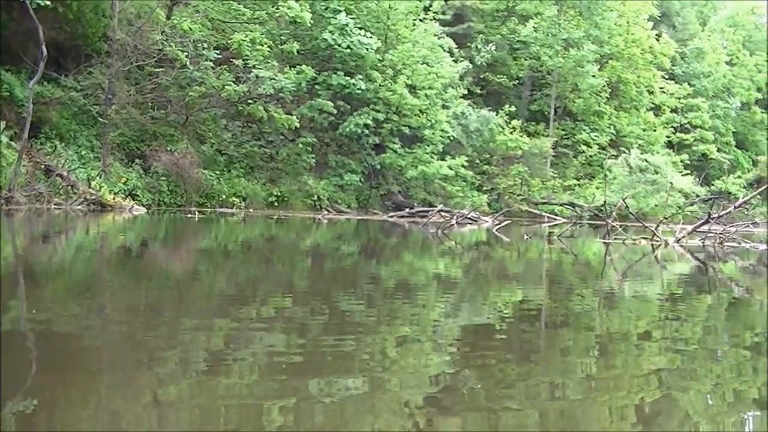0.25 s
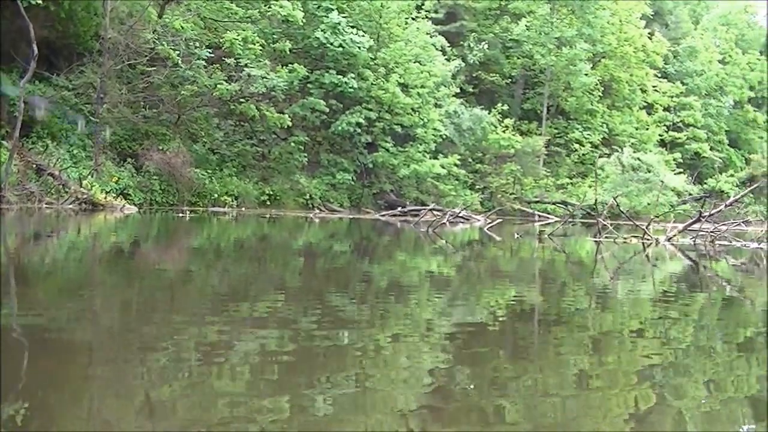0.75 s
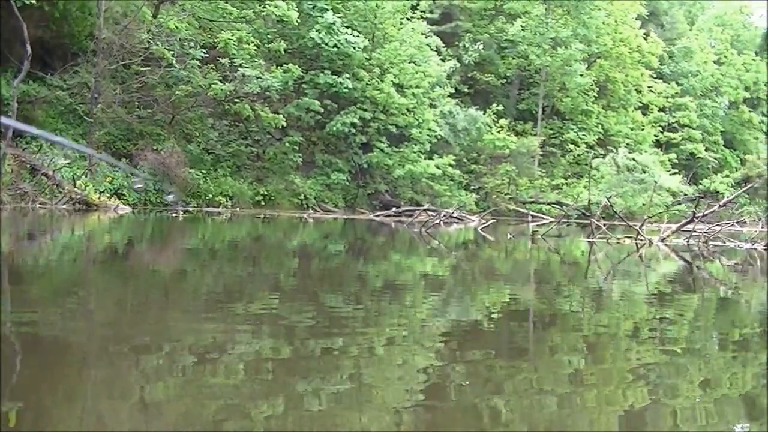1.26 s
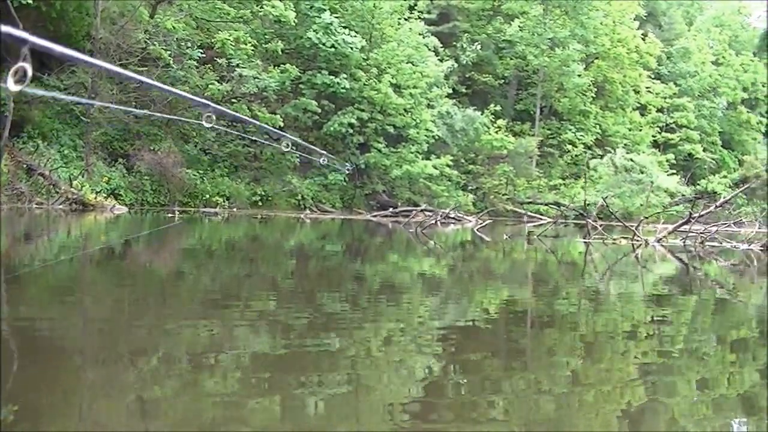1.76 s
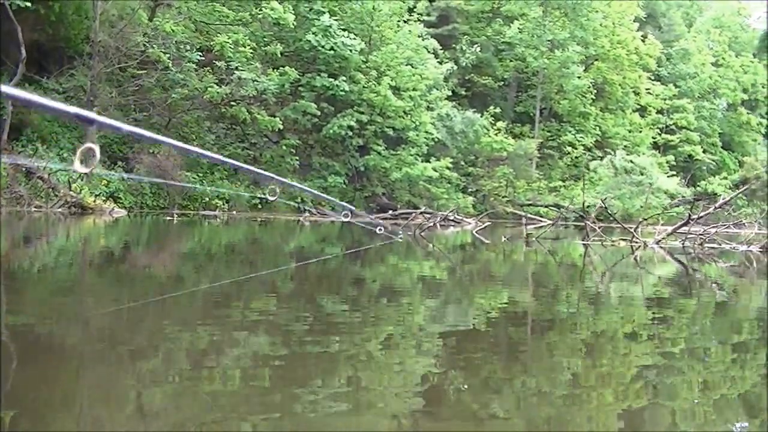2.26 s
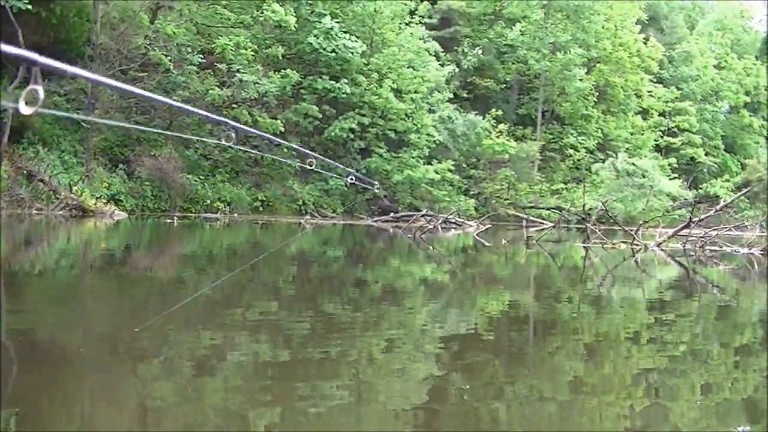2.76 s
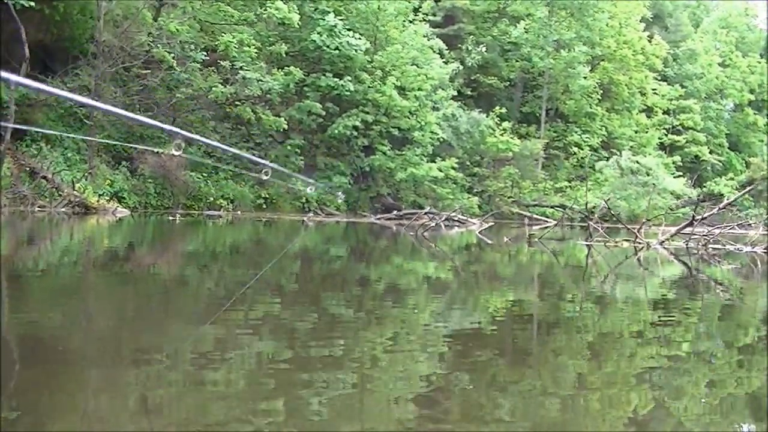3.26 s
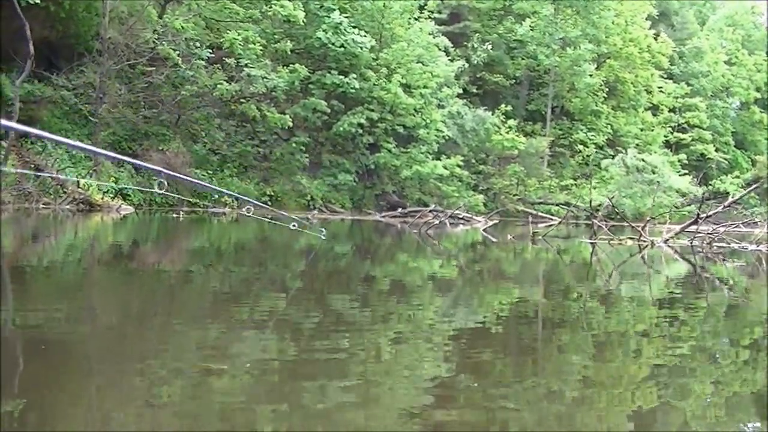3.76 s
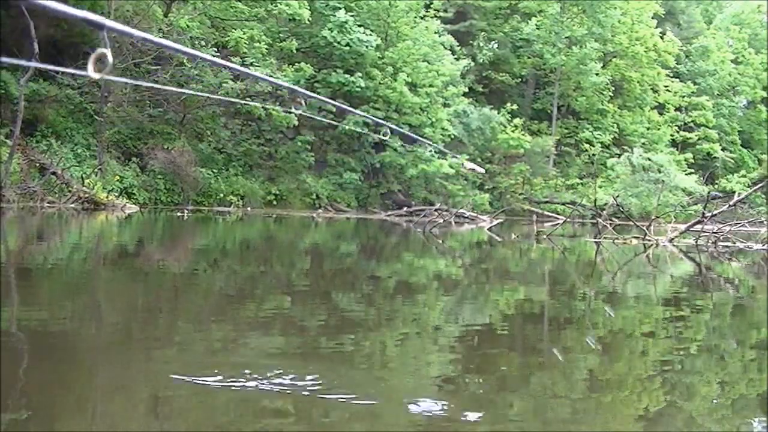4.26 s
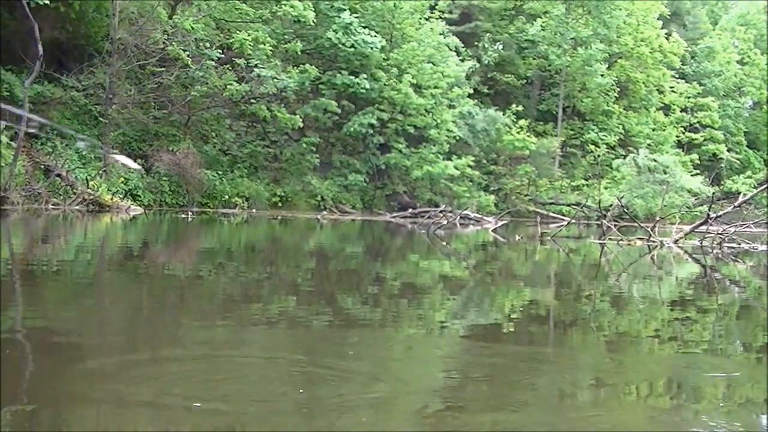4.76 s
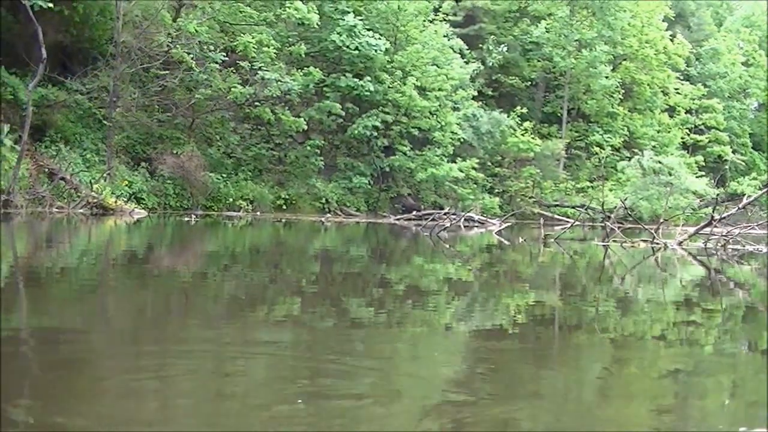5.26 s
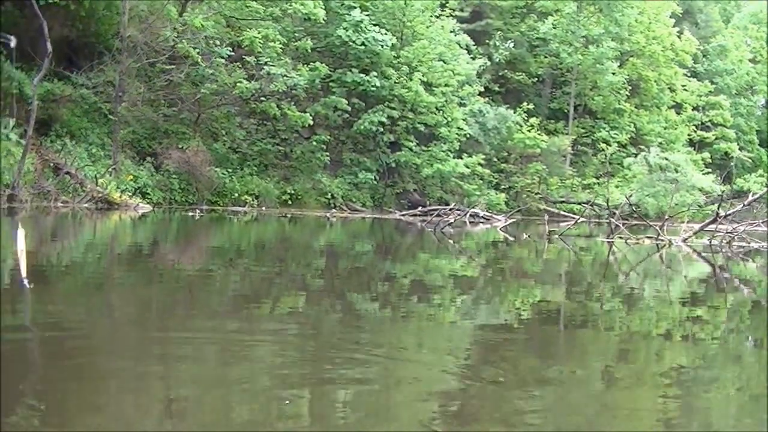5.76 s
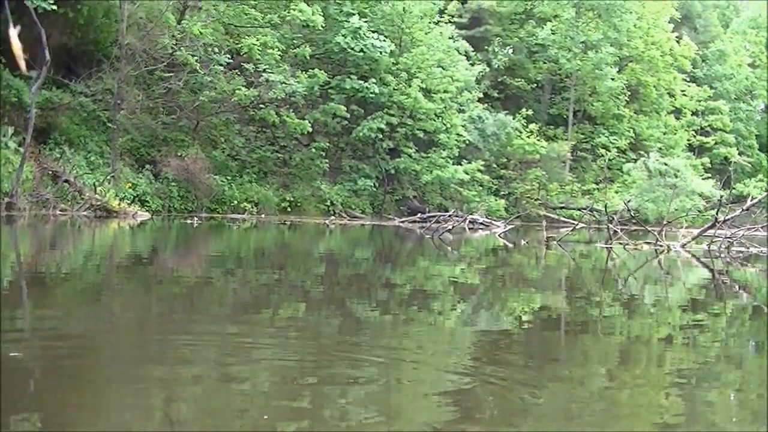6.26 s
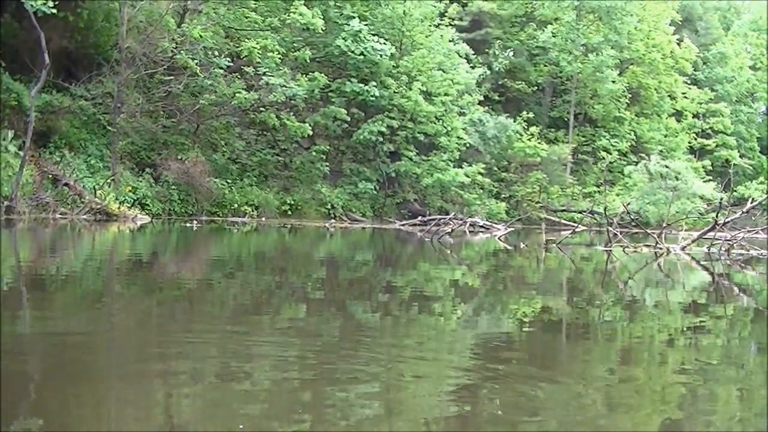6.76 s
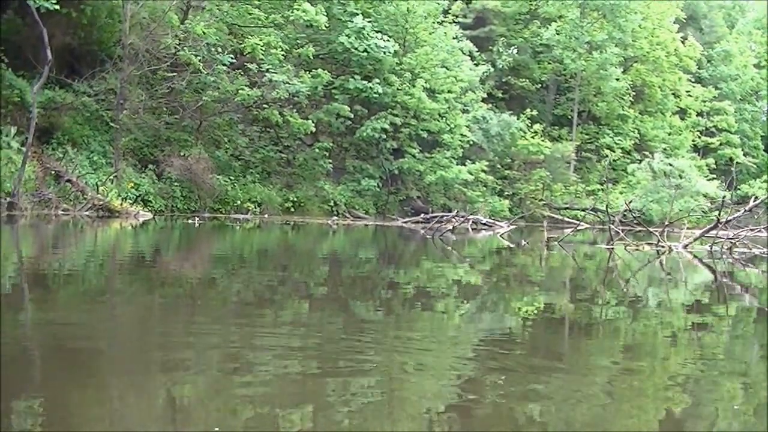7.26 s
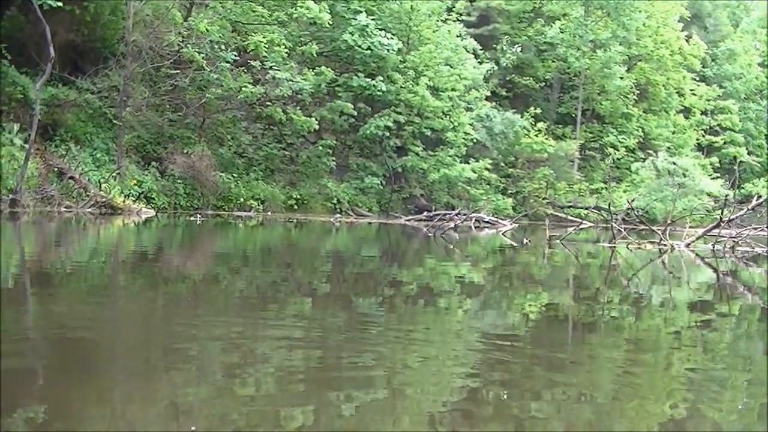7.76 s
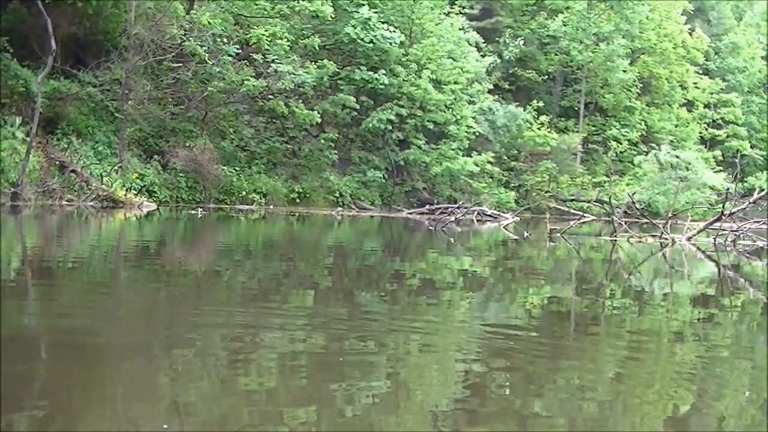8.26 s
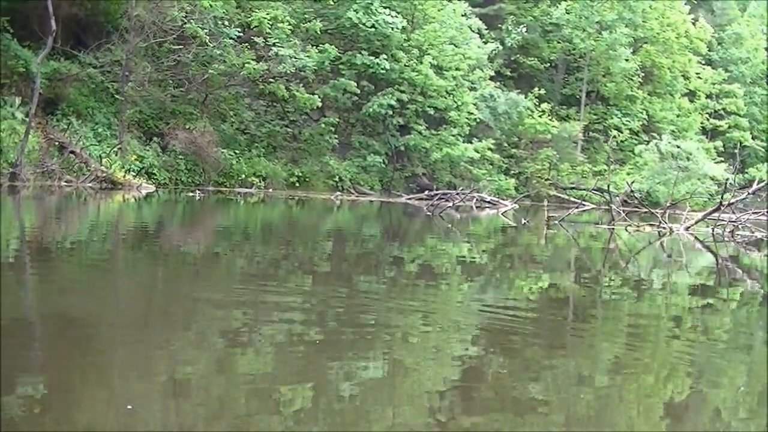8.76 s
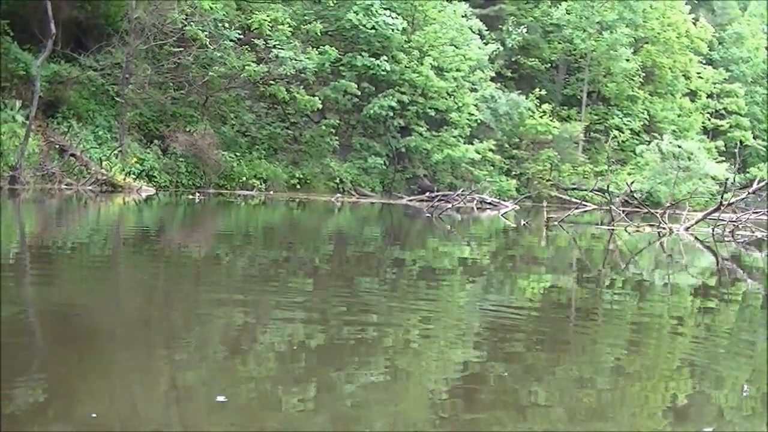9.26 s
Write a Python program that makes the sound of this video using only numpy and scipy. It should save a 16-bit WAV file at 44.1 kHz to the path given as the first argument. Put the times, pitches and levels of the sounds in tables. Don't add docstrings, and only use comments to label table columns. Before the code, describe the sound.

Soft reel winding among frogs, birds and water pops, then a hard lure rattle, ratcheting drag, a metal snap and a whooshing cast with hissing line.

```python
import sys
import numpy as np
from scipy import signal
from scipy.fft import rfft, irfft
from scipy.io import wavfile

SR = 44100
rng = np.random.default_rng(int(sys.argv[2]) if len(sys.argv) > 2 else 0)


def voltage_ratio(decibels):
    exponent = np.asarray(decibels, float) / 20
    return 10 ** exponent


def pcm_store(signal):
    levels = np.round(np.clip(np.atleast_2d(signal), -1, 1) * 32767)
    wavfile.write(sys.argv[1], SR, levels.astype(np.int16).T)


N = 419832


def unit(x):
    return x / np.sqrt(np.mean(x ** 2) + 1e-20)


def noise():
    return rng.standard_normal(N)


def drift(rate):
    knots = rng.standard_normal(400)
    return np.interp(np.arange(N) / SR * rate, np.arange(400), knots)


def in_time(rows):
    s, *columns = np.transpose(rows)
    t = np.arange(N) / SR
    starts_open = s[0] < .01
    gate = np.clip(np.minimum(t - s[0], s[-1] - t) / .02 + starts_open, 0, 1)
    return [gate * (t <= s[-1])] + [np.interp(t, s, c) for c in columns]


def band(x, lo_hz, hi_hz):
    return signal.sosfilt(signal.butter(2, [lo_hz, min(hi_hz, .45 * SR)], "band", fs=SR, output="sos"), x)


def ring(x, hz, t60):
    r, w = voltage_ratio(-60 / (t60 * SR)), 2 * np.pi * hz / SR
    return signal.lfilter([0, np.sin(w)], [1, -2 * r * np.cos(w), r * r], x + 1e-18)


def add(out, s, sound, peak_db):
    i = round(s * SR)
    out[i:i + len(sound)] += (voltage_ratio(peak_db) * sound / np.abs(sound).max())[:N - i]


def puff(rise_s, t60):
    t = np.arange(2600) / SR
    return rng.standard_normal(len(t)) * (1 - np.exp(-t / rise_s)) * voltage_ratio(-60 * t / t60)


def chirp(length_s, hz_points, second_db=-40, rough=0.):
    u = np.linspace(0, 1, max(round(length_s * SR), 8))
    flutter = np.interp(u * length_s * 350, np.arange(60), rng.standard_normal((60, 2)) @ [1, 1j])
    hz = np.interp(u, np.linspace(0, 1, len(hz_points)), hz_points)
    hz = hz * (1 + 0.056 * rough * flutter.real)
    phase = 2 * np.pi * np.cumsum(hz) / SR
    shape = np.sin(np.pi * u) ** .5 * voltage_ratio(6 * rough * flutter.imag)
    return shape * (np.sin(phase) + voltage_ratio(second_db) * np.sin(2 * phase + 1))


def whistle(hz, width_hz, count=N):
    low_pass = signal.butter(2, width_hz / 2, fs=SR, output="sos")
    slow = signal.sosfilt(low_pass, rng.standard_normal((2, count)))
    phase = 2 * np.pi * np.cumsum(hz) / SR
    return np.pad(unit(slow[0] * np.sin(phase) + slow[1] * np.cos(phase)), (0, N - count))


def woods(x, t60, gap_s):
    t = np.arange(SR) / SR
    tail = rng.standard_normal(SR) * voltage_ratio(-60 * t / t60) * (1 - np.exp(-t / gap_s))
    return signal.fftconvolve(x, tail / np.sqrt(np.sum(tail ** 2)))[:N]


def winding():
    # (time [s], level [dB])
    whirr = [(0.0, -63.5), (2.1, -67.5), (2.41, -64), (3.08, -65), (4.1, -71)]
    # (pitch [Hz], width [Hz], level [dB])
    gears = [(2404, 610, 7), (3600, 21, -2), (3810, 22, 2), (4400, 120, 9), (4820, 66, -7),
             (6040, 290, -5.5), (6500, 48, -1), (7000, 190, 2.5), (8600, 140, -13), (9400, 130, -14),
             (11300, 160, -14)]
    # (start [s], end [s], pitch [Hz], level over the whirr [dB])
    meshes = [(0, .5, 11200, -9), (0.05, .85, 9300, -12), (2.2, 3.9, 11250, -11), (2.52, 2.72, 9400, -6),
              (2.95, 3.15, 9400, -7), (3.4, 3.62, 6500, -4), (3.5, 4.0, 9350, -13), (2.3, 3.4, 8600, -13)]
    # (time [s], peak level [dB])
    insect_pulses = [(1.052, -71), (1.1308, -69), (1.4416, -67), (1.513, -68), (1.5978, -66), (1.6894, -69),
                     (1.8352, -66), (1.9126, -64), (2.0233, -67), (2.0981, -66), (2.1829, -65), (2.2638, -64),
                     (2.3426, -63), (2.5057, -64), (2.585, -67), (2.7297, -65), (2.9118, -66), (2.9871, -68),
                     (3.3528, -68), (3.4291, -66)]
    gate, level_db = in_time(whirr)
    stop = round(whirr[-1][0] * SR)
    out = .5 * unit(band(noise(), 900, 13000))
    for hz, width_hz, db in gears:
        wander_hz = hz * (1 + .008 * drift(2.5))
        patch_db = 3.5 * drift(4.) + 3 * drift(25.)
        rub = whistle(wander_hz[:stop], max(2.5 * width_hz, 250), stop)
        out += 0.33 * voltage_ratio(db / 2 + patch_db) * rub
    out = out / np.std(out[:stop]) * 1.04
    t = np.arange(N) / SR
    for start, end, hz, db in meshes:
        spell = np.clip(np.minimum(t - start, end - t) / .07, 0, 1)
        wander_hz = hz * (1 + .006 * drift(3.))
        out += spell * voltage_ratio(db - 3.5 + 3. * drift(12.)) * whistle(wander_hz[:stop], 420, stop)
    out *= gate * voltage_ratio(level_db)
    for s, db in insect_pulses:
        add(out, s - .005, chirp(.04, [12150, 12150], rough=.17), db - 6.5)
    return out


def knocks():
    # (time [s], peak level [dB], bright part [dB], pitch of the struck spot [Hz])
    hits = [(4.1004, -15.5, -13, 3750), (4.1055, -19.5, -15, 3000), (4.112, -31, -15, 2700),
            (4.118, -36, -12, 3740), (4.129, -46, -1, 3000), (4.1355, -45, 0, 2390), (4.168, -50, -4, 3500),
            (4.1767, -42, -6, 2790), (4.184, -46, -6, 3500), (4.1904, -36, -6, 2310),
            (4.195, -19.5, -14, 2250), (4.199, -24, -12, 2400), (4.2115, -44, -2, 2390),
            (4.216, -44, -2, 3500), (4.221, -44, -3, 4400), (4.2248, -34, -8, 5700),
            (4.2362, -29, -9, 3700), (4.2405, -37, -4, 3700), (4.251, -45, -4, 5500),
            (4.2574, -40, -6, 4370), (4.274, -50, -2, 2730), (4.29, -47, 2, 4800), (4.2948, -41, -3, 5700),
            (4.311, -46, -2, 4390), (4.3245, -39, -3, 4760), (4.3816, -44, -8, 4420),
            (4.388, -50, -6, 3500), (4.3999, -37, -9, 2340), (4.408, -48, -6, 3500),
            (4.4418, -49, -4, 3290), (4.448, -49, -14, 4300), (4.4544, -44, -11, 4360),
            (4.4595, -48, -14, 5000), (4.465, -40, -11, 4480), (4.472, -48, -16, 4000),
            (4.479, -47, -14, 4400), (4.486, -47, -16, 4400), (4.4927, -41, -9, 4510),
            (4.501, -46, -14, 4200), (4.5094, -46, -16, 3810), (4.519, -47, -18, 4200),
            (4.531, -49, -18, 4000), (4.5465, -48, -14, 2600), (4.6907, -47, -8, 5800),
            (4.7194, -48, -16, 5000), (4.745, -50, -8, 5800)]
    # (pitch [Hz], level [dB])
    lure = [(1700, -38), (2350, -5.5), (2700, -1.5), (3240, -9), (3750, 1), (4450, 3), (5800, -8)]
    lure_t60_s, thud_db = .011, -14
    out = np.zeros(N)
    for s, db, bright_db, spot_hz in hits:
        contact_s = .0047 + .00005 * (db + 20)
        touch = puff(contact_s / 4, 5 * contact_s)
        body = np.zeros(len(touch))
        for hz, mode_db in lure:
            nearness_db = -8 * abs(np.log2(hz / spot_hz))
            mode_hz = hz * (1 + 0.07 * rng.standard_normal())
            body += voltage_ratio(mode_db + nearness_db) * ring(touch, mode_hz, lure_t60_s)
        body = unit(body) + .9 * unit(band(touch, 2200, 8500))
        add(out, s - .0007, band(body, .42 * spot_hz, 16000), db)
        add(out, s - .0007, band(touch, 6000, 13500), db + bright_db)
        add(out, s - .0007, band(touch, 420, 800), db + thud_db - 12 * np.log2(spot_hz / 2350))
    return out


def drag():
    # (time [s], peak level [dB])
    pawl = [(5.0828, -46), (5.1083, -39), (5.1277, -37), (5.1442, -35), (5.1587, -36), (5.1726, -37),
            (5.1861, -36), (5.1981, -35), (5.2096, -34), (5.2204, -34), (5.23, -36), (5.24, -36),
            (5.2464, -38), (5.25, -34), (5.2609, -34), (5.2699, -33), (5.2784, -33), (5.2874, -35),
            (5.2979, -35), (5.3068, -33), (5.3168, -34), (5.3258, -33), (5.3348, -31), (5.3443, -32),
            (5.3524, -32), (5.3614, -34), (5.3684, -38), (5.3764, -36), (5.3862, -35), (5.3956, -33),
            (5.4036, -33), (5.4104, -32), (5.4184, -34), (5.439, -31), (5.458, -30), (5.468, -30),
            (5.4784, -32), (5.4909, -34), (5.5044, -37), (5.5194, -37)]
    # (time [s], peak level [dB])
    further_teeth = [(5.4295, -34), (5.4492, -31)]
    # (pitch [Hz], level [dB], time to die by 60 dB [s])
    spool = [(1410, -19, 0.058), (3020, -19, 0.019), (4820, -12.5, 0.11), (5780, 0, 0.005),
             (6640, 3.5, 0.005), (7460, -21.5, 0.2), (9430, -11, .006), (12600, -23, 0.025)]
    touch = np.zeros(N)
    for s, peak_db in pawl + further_teeth:
        add(touch, s - .0004, puff(.0006, .012), peak_db + 3.)
    body = sum(voltage_ratio(db - 18.5) * ring(touch, hz, t60) for hz, db, t60 in spool)
    return body + .95 * band(touch, 8300, 16000) + 0.8 * band(touch, 2200, 3900)


def bail():
    # (time [s], peak level [dB], ringing pitch [Hz])
    bail_snaps = [
        (7.4897, -12.5, 7000),
        (7.5063, -27, 6110),
        (8.2327, -15.5, 6600),
        (8.246, -25, 6040),
        (8.2504, -24, 6000),
        (8.2549, -18, 6160),
        (8.2593, -17.5, 6020),
        (8.2642, -17.5, 5900),
        (8.2784, -27, 6950),
    ]
    out = np.zeros(N)
    for s, db, hz in bail_snaps:
        touch = puff(.0001, .005)
        wire = unit(ring(touch, hz, 0.0077))
        spring = .15 * unit(ring(touch, 4400, 0.006))
        crack = 1.3 * unit(band(touch, 2500, 11000))
        add(out, s, wire + spring + crack, db)
    return out


def snaps():
    # (time [s], bright part [dB], dull part [dB])
    cracks = [(.616, -51, -43), (.7978, -46, -63), (2.167, -48, -58), (2.324, -49, -57), (3.3774, -51, -58),
              (3.938, -53, -45), (6.042, -55, -46), (6.2073, -52, -62), (6.4477, -59, -48),
              (6.8528, -52, -62), (6.904, -53, -58), (7.1132, -51, -59), (7.2, -52, -53),
              (7.5592, -51, -60), (7.5887, -50, -48), (7.6251, -47, -35.5), (7.646, -45, -55),
              (7.669, -51, -62), (7.7333, -50, -52), (7.8066, -56, -46), (7.857, -52, -43.5),
              (7.9054, -54, -44), (7.9588, -50, -43), (8.629, -53, -42), (8.7367, -48, -41),
              (8.7644, -58, -40), (8.8172, -46, -57), (8.89, -52, -46), (9.348, -58, -46.5),
              (8.146, -48, -43)]
    # (time [s], peak level [dB])
    grit = [(0.0862, -53), (0.1276, -58), (0.3504, -55), (0.3954, -55), (0.4824, -56), (0.7552, -57),
            (1.1189, -58), (1.1824, -59), (1.274, -53), (1.3309, -56), (1.503, -58), (1.717, -57),
            (1.7514, -58), (1.9126, -58), (1.9799, -60), (2.0228, -59), (2.0722, -53), (3.3533, -56),
            (3.4924, -61), (3.7464, -59), (3.8681, -57), (3.9564, -57)]
    # (time [s], peak level [dB])
    coil_slaps = [(8.3135, -43), (8.4254, -39), (8.4524, -40), (8.4774, -43), (8.5094, -48), (8.5384, -47),
                  (8.5574, -52), (8.6354, -53), (8.8024, -53)]
    out = np.zeros(N)
    for s, bright_db, dull_db in cracks:
        touch = puff(0.00084, .012)
        add(out, s - .0003, band(touch, 4700, 12400), bright_db)
        add(out, s - .0003, band(touch, 3000, 6400), dull_db)
    for s, db in grit + coil_slaps:
        add(out, s - .0003, band(puff(.0002, .006), 8000, 15500), db - 1.5)
    return out


def rod_whip():
    # (time [s], tip speed as whistle pitch [Hz], effort as rush of air [dB])
    rod_swing = [
        (8.15, 1300, -54),
        (8.175, 1650, -44),
        (8.19, 2300, -35),
        (8.202, 2822, -31),
        (8.217, 3050, -29.5),
        (8.224, 2800, -30),
        (8.232, 1700, -31.5),
        (8.26, 1200, -42),
        (8.3, 900, -58),
    ]
    # (taut at [s], pitch then [Hz], glide [Hz/s], level [dB], slack at [s])
    line_whip = [
        (8.174, 3000, 30000, -37, 8.192),
        (8.199, 5600, -20000, -31.5, 8.212),
        (8.218, 4600, -30000, -30.5, 8.227),
    ]
    gate, tip_hz, rush_db = in_time(rod_swing)
    t = np.arange(N) / SR
    tip_db = -25 + 27 * np.log2(tip_hz / 3000)
    swing = voltage_ratio(tip_db) * whistle(tip_hz, 600)
    for taut, taut_hz, glide, whip_db, slack in line_whip:
        outside_s = np.maximum(np.maximum(taut - t, t - slack), 0)
        line_hz = taut_hz + glide * np.clip(t - taut, 0, slack - taut)
        swing += voltage_ratio(whip_db - 2500 * outside_s) * whistle(line_hz, 450)
    swing += voltage_ratio(rush_db - 3.2 + 3. * drift(150.)) * unit(band(noise(), 650, 6800))
    return gate * swing


def payout():
    # (time [s], hiss level [dB], hiss centre [Hz])
    hiss_course = [
        (8.19, -51, 7000),
        (8.26, -47, 6970),
        (8.3, -44.5, 8900),
        (8.38, -45, 9700),
        (8.5, -47.5, 8300),
        (8.63, -54.5, 6900),
        (8.75, -63, 6380),
        (8.95, -70, 5470),
    ]
    dry_s = 8.27
    coils_per_s, slowing_per_s2, flutter_db, sway = 85, 70, 2.0, .08
    open_spool, hiss_db, hiss_hz = in_time(hiss_course)
    after_s = np.arange(N) / SR - dry_s

    slaps = (rng.random(N) < 160 / SR) * rng.exponential(1, N)
    slaps = signal.lfilter([1], [1, -voltage_ratio(-60 / (0.0099 * SR))], slaps) * noise()

    coil_rate = (coils_per_s - slowing_per_s2 * after_s) * voltage_ratio(2 * drift(25.))
    coils = np.cumsum(coil_rate) / SR
    sway_hz = hiss_hz * (1 + sway * np.sin(2 * np.pi * coils) + .06 * drift(30.))
    core = unit(whistle(sway_hz, 1800) + .9 * whistle(1.04 * hiss_hz, 4500))
    depth_db = flutter_db * np.clip(5 * after_s, 0, 1.5)
    flutter = voltage_ratio(depth_db * (1 - 2 * (coils % 1)) + 2.2 * drift(60.))
    hiss = flutter * core + .07 * unit(band(slaps, 3000, 15000))

    spray_db = -40.5 - 130 * np.maximum(after_s, 0)
    spray = voltage_ratio(spray_db + 4.9 * drift(120.)) * unit(band(noise(), 9600, 16000))
    return open_spool * (voltage_ratio(hiss_db) * hiss + spray)


def cast():
    out = band(rod_whip() + payout(), 320, 19000)
    return out + voltage_ratio(-18.5) * woods(out, 1.0, 0.014)


def drips():
    # (time [s], peak level [dB], pitch [Hz])
    pops = [(0.2776, -43.5, 2830), (0.4335, -42.5, 2250), (0.608, -45, 1730), (0.6258, -50, 1320),
            (0.769, -40.5, 2230), (0.8998, -50, 1420), (0.9178, -42.5, 2130), (0.957, -48, 2730),
            (1.1108, -45, 3060), (1.2994, -45.5, 2500), (1.33, -44, 2850), (1.4057, -43.5, 2450),
            (1.6663, -40.5, 2320), (1.717, -44, 2730), (1.7634, -49, 1470), (1.7788, -42.5, 2450),
            (2.0794, -48.5, 2400), (2.8515, -49, 2480), (2.9118, -49.5, 1720), (3.2111, -53, 2200),
            (3.283, -41.5, 2530), (3.3153, -54, 1390), (3.4423, -47, 1810), (5.2448, -41, 3070),
            (6.6992, -50, 2800), (7.9615, -47, 1410), (8.0353, -47.5, 1410), (8.5787, -47.5, 1923),
            (8.885, -54, 1470), (8.985, -51, 1540)]
    out, t = np.zeros(N), np.arange(600) / SR
    for s, db, hz in pops:
        cycles = hz * (.95 * t + 8 * t ** 2)
        bubble = np.sin(2 * np.pi * cycles) * (1 - np.exp(-t / 0.00013)) * voltage_ratio(-60 * t / 0.02)
        crack = band(puff(0.000085, 0.02), .6 * hz, 1.5 * hz)
        crack = band(crack, .55 * hz, 1.6 * hz)[:len(t)]
        add(out, s - .0005, bubble + 1.4 * crack, db + 5)
    return out + voltage_ratio(-7) * woods(out, 1.0, 0.001)


def trills():
    # (start [s], beat [s], slowing [s per beat], peak level [dB], fade [dB per beat])
    near_trills = [
        (.0388, .0232, 0, -43.5, -.25),
        (1.4668, .0209, .00006, -53.5, -.22),
    ]
    # (start pitch [Hz], end pitch [Hz], octave level [dB])
    voices = [(1200, 1640, -2.5), (1200, 1520, -4)]
    trill_beats = [np.delete(np.arange(22), [2, 4, 7, 9, 11]), np.arange(21)]
    second_beat_db = [0, 7]
    out = np.zeros(N)
    for trill, beats, stress_db, voice in zip(near_trills, trill_beats, second_beat_db, voices):
        start, beat_s, slowing, peak_db, fade_db = trill
        start_hz, end_hz, octave_db = voice
        for k in beats:
            s = start + k * (beat_s + k * slowing / 2)
            db = peak_db + fade_db * k + stress_db * (k == 1) + 1.6 * rng.standard_normal()
            add(out, s - .003, chirp(0.0088, [start_hz, end_hz], second_db=octave_db, rough=0.16), db + 4)
    return out


def clucks():
    # (time [s], peak level [dB], length [s])
    single_clucks = [
        (0.5725, -43, 0.011),
        (0.7198, -42, 0.017),
        (0.9004, -68, 0.016),
        (1.9935, -45, 0.02),
    ]
    out = np.zeros(N)
    for s, db, length_s in single_clucks:
        add(out, s - .002, chirp(length_s, [1270, 1310, 1350], second_db=0, rough=0.45), db + 6.5)
    return out


def ticks():
    tick_times = [5.7623, 5.874, 6.1739, 6.3195, 6.4238, 6.5879, 6.7176, 6.8483, 6.9596, 7.2275, 7.3582,
                  7.6111, 7.7603, 7.8645, 7.9952, 8.3564, 8.6038, 8.7296, 8.8687, 8.9017, 9.0044, 9.1292,
                  9.2609, 9.2963, 9.4165]
    out = np.zeros(N)
    for s in tick_times:
        hz = 3620 * (1 + .012 * rng.standard_normal())
        db = -56.5 + 1.1 * (s - tick_times[0])
        add(out, s - .001, chirp(0.0051, [0.92 * hz, 1.06 * hz]), db + 1.5)
    return out


def far_trill():
    # (time [s], level [dB])
    far_course = [(6.49, -67), (7.374, -67.5), (7.5, -70)]
    out = np.zeros(N)
    for s in np.arange(far_course[0][0], far_course[-1][0], .0215):
        add(out, s, chirp(0.0125, [1200, 1420], second_db=9.5, rough=0.37), 8 + 3.5 * rng.standard_normal())
    return out * voltage_ratio(in_time(far_course)[1])


def frogs():
    near, dry, far = trills() + ticks(), clucks(), far_trill()
    echo = band(woods(near + .4 * dry, 1.0, 0.0067), 1670, 7100)
    return near + dry + voltage_ratio(-2.5) * echo + voltage_ratio(-7) * far + 1.2 * woods(far, 0.89, 0.013)


def sing(out, starts, notes, rough, note_db):
    for start, song_db, fade_db in starts:
        for (s, length_s, *hz), effort_db in zip(notes, note_db):
            add(out, start + s, chirp(length_s, hz, rough=rough), song_db + fade_db * s + effort_db)


def birds():
    # (time from start [s], length [s], start [Hz], middle [Hz], end [Hz])
    song = [(0, .0372, 4015, 3484, 3890), (.036, .07, 4150, 3560, 3250), (.1, .04, 3250, 2980, 2780),
            (.208, .032, 4720, 4500, 4030), (.23, .021, 4170, 4075, 4240), (.272, .024, 3550, 3300, 3100),
            (.338, .042, 3750, 3080, 2900), (.41, .05, 2400, 2200, 2000), (.497, .062, 1750, 2280, 2560),
            (.673, .03, 1550, 1750, 1950), (.741, .012, 5650, 5100, 4550), (.752, .022, 4500, 4900, 4500)]
    song_stress_db = [0, 0, -5, 0, -2, -2, -1, 0, 1, -4, 0, -1]
    # (time [s], level [dB], fade [dB/s])
    song_starts = [
        (.758, -49, 1.5),
        (4.626, -48.5, -1.5),
        (8.012, -46, -6),
    ]
    phrase_times = [6.201, 6.419, 6.66, 6.901, 7.12, 7.341]
    # (time from start [s], length [s], start [Hz], middle [Hz], end [Hz])
    phrase = [
        (0, .06, 5500, 4700, 4050),
        (.078, .05, 5900, 6300, 7000),
        (.13, .04, 4270, 4730, 5170),
    ]
    # (time [s], length [s], start [Hz], middle [Hz], end [Hz])
    strays = [(5.9, .12, 3500, 3150, 3050), (6.88, .05, 3800, 3400, 3700), (7.065, .03, 4600, 4300, 4050),
              (7.12, .1, 3000, 2500, 2200), (7.275, .06, 2200, 2600, 2800), (2.2, .05, 3900, 3800, 3750),
              (7.875, .04, 4450, 4100, 3600)]
    near, far = np.zeros((2, N))
    effort_db = [5.5 * np.log2(note[3] / 3500) + stress for note, stress in zip(song, song_stress_db)]
    sing(near, song_starts, song, .42, effort_db)
    swelling = [(s, -53.5 + 10.5 * (s - phrase_times[0]), -40) for s in phrase_times]
    sing(far, swelling, phrase, .8, [0] * len(phrase))
    sing(far, [(0, -53.5, 0)], strays, .55, [0] * len(strays))
    near_echo = voltage_ratio(-1.5) * woods(near, .8, .004)
    far_echo = voltage_ratio(-4) * woods(far, .55, .015)
    return .95 * near + near_echo + 0.2 * far + far_echo


def lapping():
    # (time [s], level [dB])
    wavelets = [
        (.7, -76),
        (1.1, -66.5),
        (1.9, -66),
        (2.4, -76),
    ]
    rocking, wash_db = in_time(wavelets)
    return rocking * voltage_ratio(wash_db + 2.5 * drift(14.)) * unit(band(noise(), 550, 3200))


def air():
    # (pitch [Hz], level per Hz [dB])
    hush = [(18, -66), (30, -52), (53, -29.5), (145, -7.5), (184, -20), (227, 0), (273, -5.5), (889, -10),
            (1010, -14), (2010, -13.5), (2480, -13), (3580, -14), (3980, -15), (6900, -21), (16000, -31.5)]
    # (time [s], level [dB])
    far_rumble = [(0.0, -67.5), (2.6, -54.5), (2.73, -60.5), (3.84, -49.5), (5.19, -62), (6.55, -60.5),
                  (6.6, -71), (7.66, -62.5), (9.52, -73)]
    hz, db = np.transpose(hush)
    grid_hz = np.maximum(np.arange(N // 2 + 1) * SR / N, 1)
    colour = voltage_ratio(np.interp(np.log(grid_hz), np.log(hz), db))
    floor = unit(irfft(rfft(noise()) * colour, N))
    rumble = unit(band(band(noise(), 150, 325), 98, 900))
    return voltage_ratio(-61) * floor + voltage_ratio(in_time(far_rumble)[1] - 6.5) * rumble


def scene():
    tackle = knocks() + drag() + bail() + snaps()
    hull_echo = band(woods(tackle, 0.12, 0.0011), 670, 7700)
    tackle = band(tackle, 720, 26000) + voltage_ratio(-15) * hull_echo
    return (winding() + tackle + cast() + drips() + frogs() + birds() + lapping() + air())[None]


def band_limit(x):
    return signal.sosfilt(signal.butter(12, 16820, fs=SR, output="sos"), x)


def record(dry):
    mix = dry + voltage_ratio(-88) * band(noise(), 12, 60)
    mix = signal.sosfilt(signal.cheby2(10, 40, 16700, fs=SR, output="sos"), mix)
    mix = signal.sosfilt(signal.cheby2(10, 20, 15950, fs=SR, output="sos"), mix)
    return band_limit(mix)


dry = scene()
out = record(dry)
pcm_store(out)
```